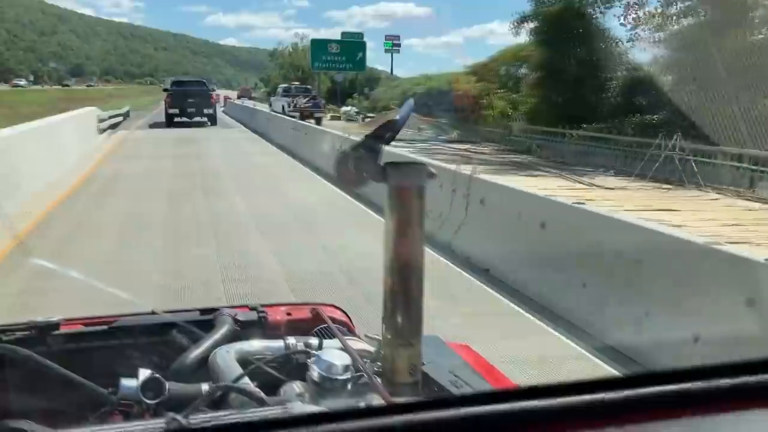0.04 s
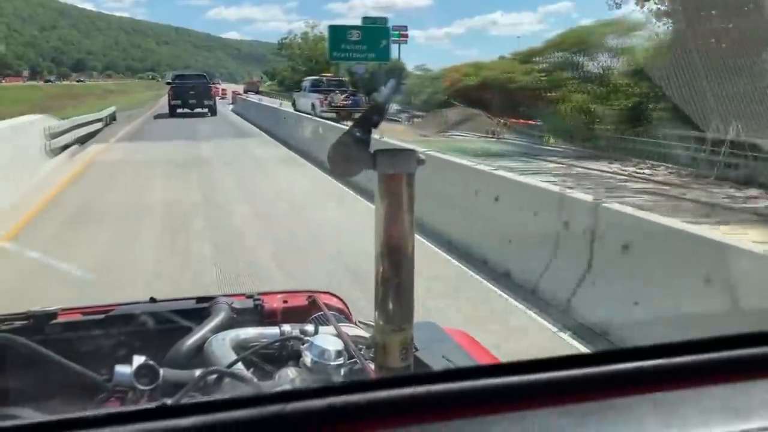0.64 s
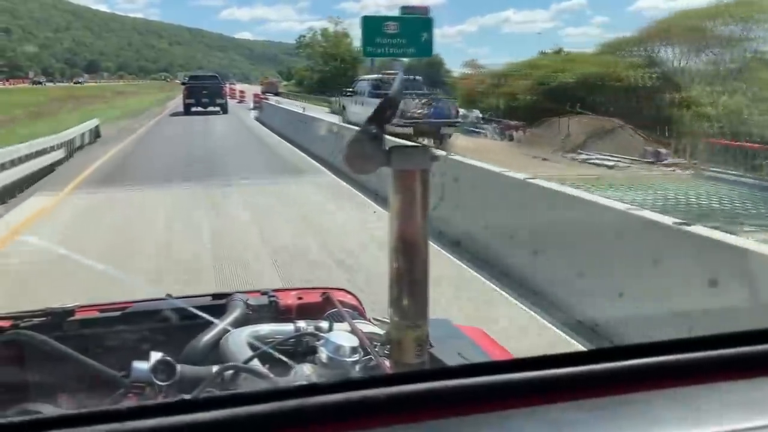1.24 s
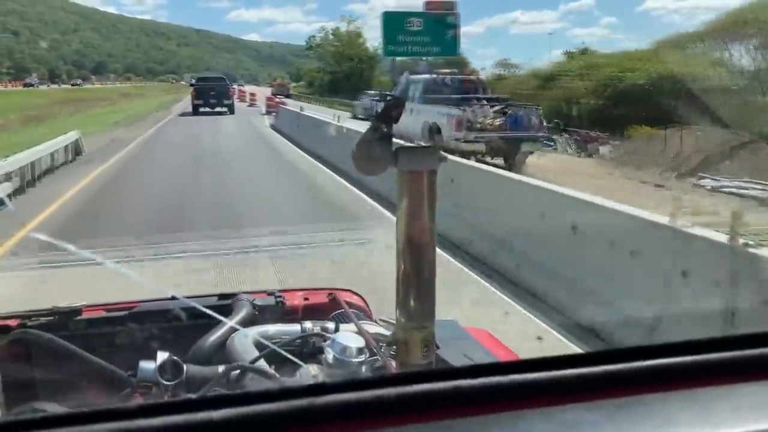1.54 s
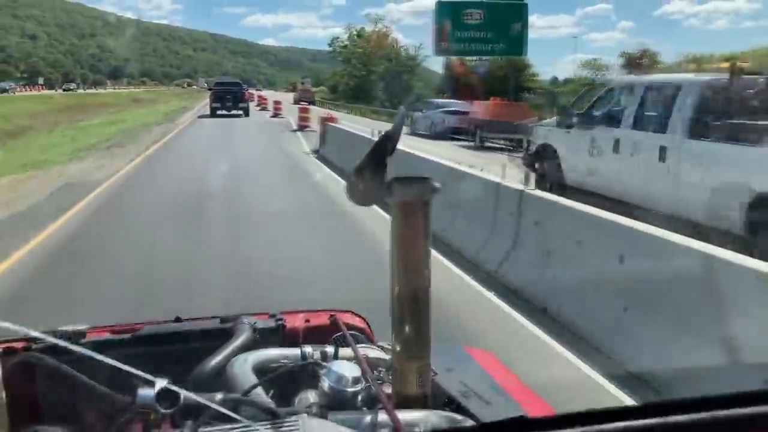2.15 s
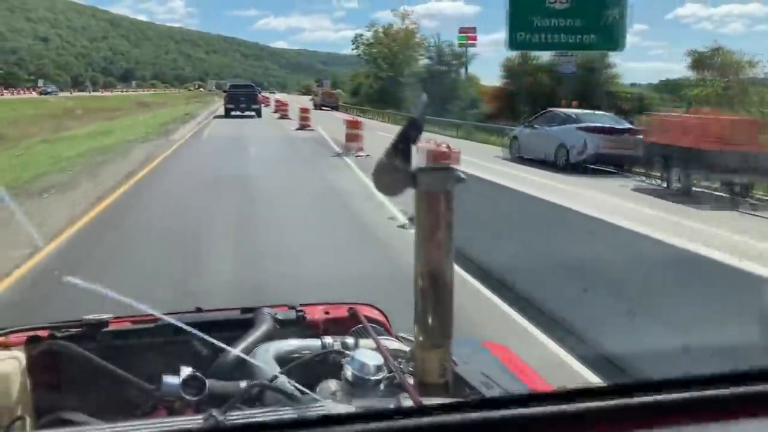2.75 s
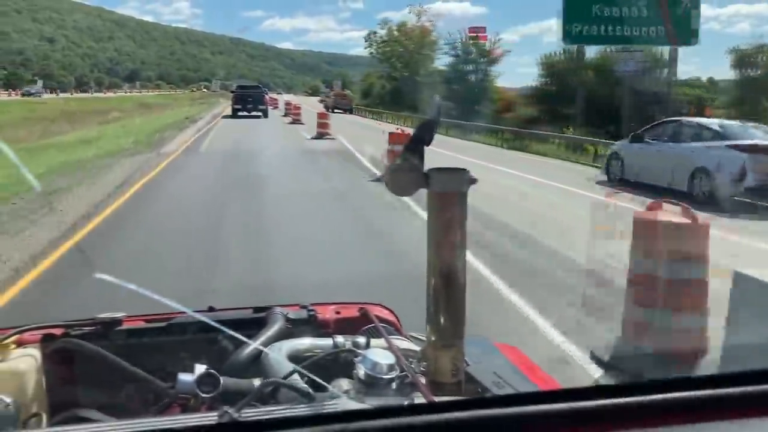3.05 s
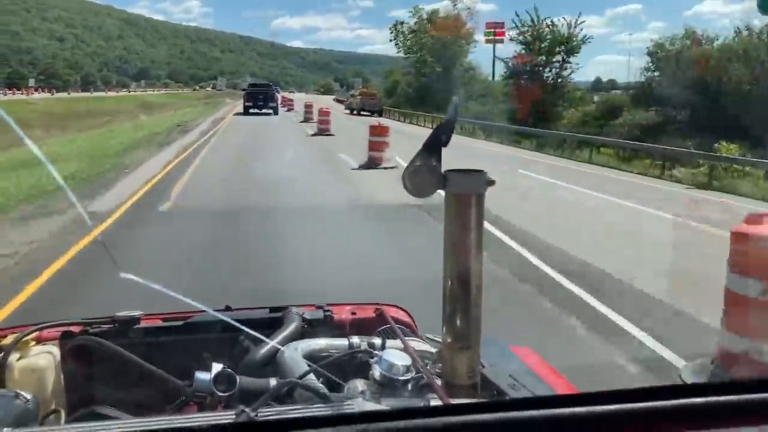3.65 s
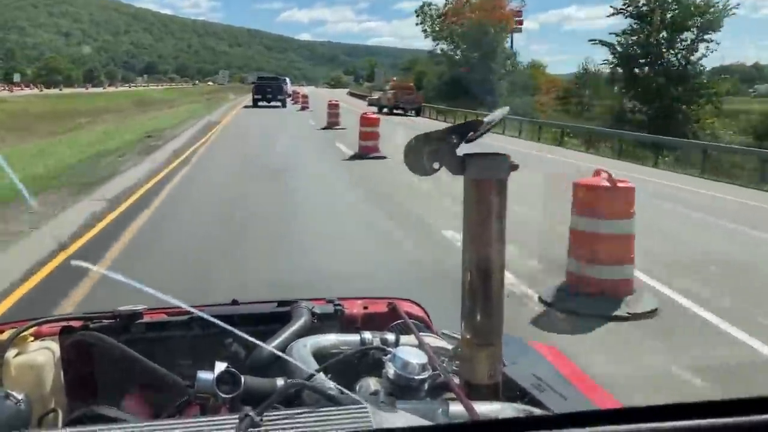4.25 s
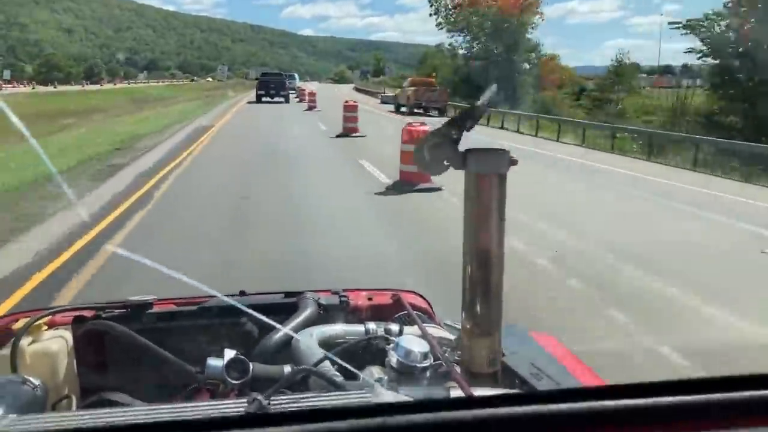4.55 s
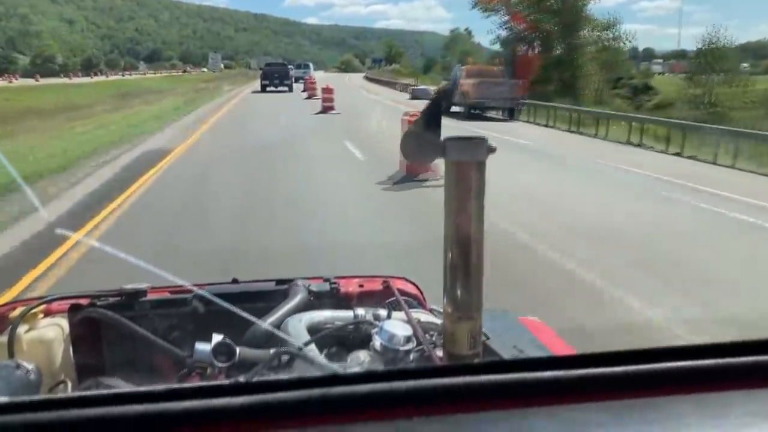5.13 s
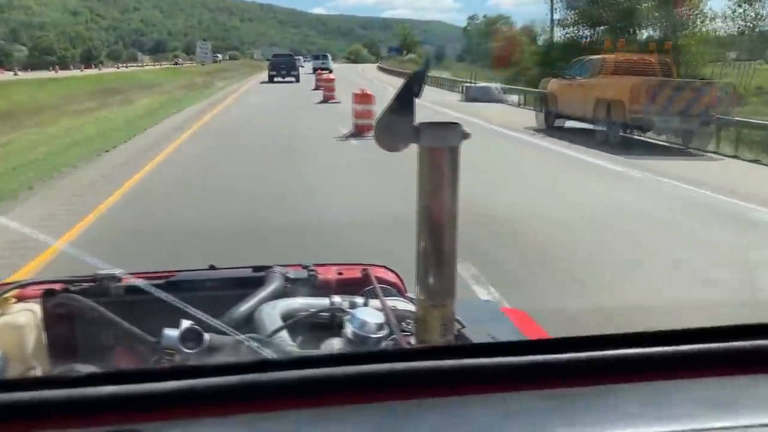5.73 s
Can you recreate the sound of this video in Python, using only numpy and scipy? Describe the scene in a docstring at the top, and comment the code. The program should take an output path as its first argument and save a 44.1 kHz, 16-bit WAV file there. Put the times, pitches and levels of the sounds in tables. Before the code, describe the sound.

Heard from inside a moving truck's cab, a turbocharged six-cylinder engine drones loudly over road rumble while its open exhaust stack barks and rasps. The turbo whistle climbs steadily. Near four seconds the throttle shuts for an upshift: air hisses out, the whistle dies and the metal rain flap clatters on the stack. The engine then pulls again at a lower pitch and the whistle rises once more.

```python
"""Turbocharged straight-six, heard from the cab

The engine pulls hard over road rumble. Its firings boom in the cab and drive an open stack through the
bonnet, which barks and rasps; they also modulate the climbing whistle of the turbo. Near four seconds
the throttle shuts for an upshift: trapped boost vents, the rain flap clatters on the stack, and then
the turbo spools up again."""
import sys
import numpy as np
from scipy import signal
from scipy.fft import rfft, irfft, next_fast_len
from scipy.io import wavfile

SR = 44100
rng = np.random.default_rng(int(sys.argv[2]) if len(sys.argv) > 2 else 0)


def transcribe(signal):
    """Save signal, clipped to [-1, 1], as a 16-bit WAV file at the path in sys.argv[1]."""
    frames = np.atleast_2d(signal).T
    limited = np.clip(frames, -1, 1)
    pcm = np.round(limited * 32767).astype(np.int16)
    wavfile.write(sys.argv[1], SR, pcm)


N = 259660
SHUT_S, OPEN_S = 3.77, 4.53  # the throttle starts to shut and to reopen
STACK_HZ = 572.5  # main note of the open stack
# Strength of the cylinders in firing order. Each entry: relative level in dB.
CYLINDER_LEVELS = [3, 0, 1, 2.5, -.5, 1]


def from_db(db):
    """Amplitude grows tenfold for every 20 dB."""
    return 10 ** (np.asarray(db) / 20)


def rms_one(x):
    """Division by the root mean square gives unit power."""
    return x / np.sqrt(np.mean(x ** 2) + 1e-20)


def ramp(start_s, length_s):
    """A linear rise from 0 to 1."""
    return np.clip((np.arange(N) / SR - start_s) / length_s, 0, 1)


def in_time(rows):
    """Linear interpolation gives each column of a timed curve at every sample."""
    times, *columns = np.transpose(rows)
    return [np.interp(np.arange(N) / SR, times, column) for column in columns]


def at_hz(points, hz):
    """Interpolation on a logarithmic frequency axis."""
    frequencies, values = np.transpose(points)
    return np.interp(np.log(hz), np.log(frequencies), values)


def drift(corner_hz):
    """Low-passed noise wanders slowly with a spread of 1."""
    step, settle = 40, 2000
    r = np.exp(-2 * np.pi * corner_hz * step / SR)
    slow = signal.lfilter([1], [1, -2 * r, r * r], rng.standard_normal(N // step + settle + 2))[settle:]
    return np.interp(np.arange(N) / step, np.arange(len(slow)), rms_one(slow))


def resonance(x, hz, width_hz):
    """Forced response of a two-pole resonator with unit gain at its peak."""
    r = np.exp(-np.pi * width_hz / SR)
    feedback = [1, -2 * r * np.cos(2 * np.pi * hz / SR), r * r]
    return signal.lfilter(np.array([1, 0, -1]) * (1 - r * r) / 2, feedback, x)


def coloured(x, peaks):
    """Parallel resonators raise or lower a sound around their own frequencies."""
    return x + sum((from_db(db) - 1) * resonance(x, hz, width) for hz, width, db in peaks)


def ring(clicks, hz, t60):
    """Free vibration: each impulse starts a damped sine of its own height."""
    r, w = from_db(-60 / (t60 * SR)), 2 * np.pi * hz / SR
    return signal.lfilter([0, np.sin(w)], [1, -2 * r * np.cos(w), r * r], clicks + 1e-18)


def pan(x, left_db):
    """A level difference between the ears places a sound to one side."""
    return x * from_db(np.array([[left_db], [-left_db]]) / 2)


def turbulence(spectrum, drive=None):
    """Noise, or a given drive, shaped in third octaves; reflections lower the left-right coherence."""
    # Each row: frequency in Hz, correlation between the ears.
    coherence = [(60, .94), (290, .85), (450, .4), (640, .25), (1300, .25), (3000, .3), (5000, .55),
                 (7000, .7), (9300, .85), (15000, .75)]
    edges = 20 * 2 ** (np.arange(30) / 3)
    if drive is None:
        drive = rng.standard_normal((2, 2, N))  # two mid-side pairs, for alternate bands
    out = 0
    for k, (low, high) in enumerate(zip(edges, edges[1:])):
        if high > spectrum[0][0] and low < spectrum[-1][0]:
            hz = np.sqrt(low * high)
            band = signal.butter(2, [low, high], "band", fs=SR, output="sos")
            mid, side = signal.sosfilt(band, drive[k % 2])
            alike = at_hz(coherence, hz)
            stereo = np.sqrt(1 + alike) * mid + np.sqrt(1 - alike) * side * [[1], [-1]]
            out = out + from_db(at_hz(spectrum, hz)) * stereo
    return rms_one(out)


def road_rumble():
    """Rolling on the road gives broadband noise, strongest at low frequencies."""
    # Each row: frequency in Hz, relative spectral density in dB.
    spectrum = [(20, -32), (32, -16), (45, -6.5), (62, 5), (85, -3.5), (130, -3.5), (200, -1.5),
                (290, -5.5), (420, -21.5), (700, -21.5)]
    # Each row: time in seconds, level in dB.
    levels = [(0.1, -12.5), (.55, -17.5), (1.75, -22), (2.25, -20), (2.9, -21), (3.4, -24), (3.7, -23),
              (3.98, -18.5), (4.43, -19), (4.8, -20.5), (5.4, -18.5), (5.89, -20)]
    return from_db(in_time(levels)[0]) * turbulence(spectrum)


def cycle_harmonics(firings, orders, waver):
    """A pattern that repeats each engine cycle has lines at multiples of that rate; each one wavers."""
    out = 0
    for per_cycle, db in orders:
        phase = 2 * np.pi * (round(per_cycle) * firings / len(CYLINDER_LEVELS) + rng.random())
        wander = drift(4.9) * np.cos(phase) + drift(9.1) * np.sin(phase)
        out = out + from_db(db) * (np.sin(phase) + waver * wander)
    return out * np.sqrt(2 / (1 + 2 * waver ** 2))


def uneven_beat(firings, boost, shut, shifted):
    """No two cylinders fire alike, so engine orders appear between the firing harmonics."""
    # Full pull. Each row: times per engine cycle, level in dB at low boost and at high boost.
    pull_orders = [(5, -32, -44), (8, -34, -42), (9, -31, -35), (10, -24, -34), (11, -31, -42),
                   (13, -34, -32), (14, -27, -30.5), (15, -22.5, -28), (16, -26, -40), (17, -31, -32),
                   (18, -26, -28), (19, -32, -45), (20, -36, -43), (21, -35, -38), (23, -38, -50),
                   (24, -30, -41), (25, -36, -45), (29, -48, -38), (31, -45, -41), (33, -34, -50)]
    # Lugging in the higher gear. Each row: times per engine cycle, level in dB.
    lug_orders = [(5, -30), (8, -35), (10, -32), (13, -30), (14, -26.5), (15, -25.5), (16, -31.5),
                  (17, -36), (18, -31), (20, -37), (21, -34), (22, -39), (23, -41)]
    boosted = [(order, low + boost * (high - low)) for order, low, high in pull_orders]
    pulling = cycle_harmonics(firings, boosted, waver=.2)
    lugging = cycle_harmonics(firings, lug_orders, waver=.5)
    return from_db(-6 * shut) * (np.sqrt(1 - shifted) * pulling + np.sqrt(shifted) * lugging)


def drone(rate, firings, boost, shut, shifted):
    """The cab resonates to the firing tone and its octave; the boom steadies under full pull."""
    # Response of the cab. Each row: frequency in Hz, level in dB.
    boom = [(82, -22), (93, -20), (100, -14), (106, -11.5), (113, -11), (119, -11.5), (168, -21.5),
            (186, -27), (194, -13), (203, -15), (212, -17.5), (238, -20.5)]
    overrun = ramp(3.92, .036) - ramp(OPEN_S, .036)  # the firing dies during the shift
    throttle_db = -3.5 * shut - 10 * overrun
    waver_db = 1.6 * (1 - boost * (1 - shifted))
    firing_db, octave_db = (at_hz(boom, k * rate) + throttle_db + waver_db * drift(7.1) for k in (1, 2))
    fundamental = pan(from_db(firing_db) * np.sin(2 * np.pi * firings), left_db=-2.5)
    octave = pan(from_db(octave_db) * np.sin(4 * np.pi * firings - .8), left_db=-2)
    return np.sqrt(2) * (fundamental + octave)


def driveshaft(rate, boost):
    """Rotation shakes the shaft once a turn; its fourth harmonic booms at lower road speed."""
    shaft_hz = .472 * np.maximum.accumulate(rate)  # keeps its speed through the shift
    phase = 2 * np.pi * np.cumsum(shaft_hz + .8 * drift(5)) / SR
    shudder = from_db(-27 + 2.5 * drift(6)) * np.sin(phase)
    return np.sqrt(2) * (shudder + from_db(-33) * (1 - boost) * np.sin(4 * phase))


def puffs(firings, depth, decay, uneven_db):
    """Amplitude modulation: each firing gives a puff of its own strength; decay is in firing periods."""
    strength = from_db(uneven_db * rng.standard_normal(1000))[firings.astype(int)]
    age = firings % 1
    puff = rms_one(strength * age * np.exp(-age / decay))
    return rms_one(1 - depth + depth * puff)


def blasts(firings, pitched, ring_s, depth, uneven_db):
    """Repetition gives pitch: each cylinder sends the same shock every cycle, plus fresh turbulence."""
    count, age = len(CYLINDER_LEVELS), np.arange(SR // 25) / SR
    shared = .15  # share of the shock's power that all cylinders have in common
    common, own = rng.standard_normal((2, 2, len(age))), rng.standard_normal((count, 2, 2, len(age)))
    shapes = (np.sqrt(shared) * common + np.sqrt(1 - shared) * own) * np.exp(-age / ring_s)
    shocks = np.zeros((2, 2, N + len(age)))
    for k, at in enumerate(np.flatnonzero(np.diff(np.floor(firings)))):
        strength = from_db(CYLINDER_LEVELS[k % count] + uneven_db * rng.standard_normal())
        shocks[..., at:at + len(age)] += strength * shapes[k % count]
    gas = rng.standard_normal((2, 2, N)) * puffs(firings, depth, decay=.39, uneven_db=2)
    return np.sqrt(pitched) * rms_one(shocks[..., :N]) + np.sqrt(1 - pitched) * gas


def pipe_flow(spectrum, drive=None):
    """Narrow resonances of stack and cab stand out of the flow noise."""
    # Each row: frequency in Hz, width in Hz, gain in dB.
    resonances = [(770, 29, 4), (895, 40, 1), (1060, 120, -5), (1226, 49, 9), (1327, 60, 0.5),
                  (1480, 31, 5.5), (1718, 23, 8.5), (1878, 67, 8.5), (2105, 27, 6), (2237, 47, 11),
                  (2467, 59, 6.5), (2740, 45, 6), (3360, 23, 2), (5790, 140, 7), (7950, 200, 5)]
    return rms_one(coloured(turbulence(spectrum, drive), resonances))


def stack_ring(rate, firings, shut):
    """Forced resonance: the firings keep the open stack ringing on one note."""
    # Each row: firings per second, level of the note in dB.
    response = [(84, -29.5), (92, -38.5), (97, -26), (104, -39.5), (107, -28.5), (112, -38), (118, -31)]
    mid, side = blasts(firings, pitched=.4, ring_s=.01, depth=.1, uneven_db=1)[0]
    drive = mid + .5 * side * [[1], [-1]]
    note = resonance(resonance(drive, STACK_HZ, width_hz=46), STACK_HZ, width_hz=92)
    return from_db(at_hz(response, rate) - 11 * shut) * rms_one(note)


def exhaust(rate, firings, turbo_hz, boost, shut, shifted):
    """Pulsating flow makes the stack bark, rasp and hiss; at full boost it tightens to a snarl."""
    # Four spectra of the gas flow. Each row: frequency in Hz, relative spectral density in dB.
    bark_spectrum, rasp_spectrum = [(230, -9), (330, 1), (400, 3), (490, -4), (575, -1), (670, -2),
                                    (800, -3.5), (950, -3), (1100, -12), (1600, -45)], [(750, -13), (1050, -4), (1250, 1), (1500, 1), (1800, -2),
                                                  (2250, -6), (2800, -5.5), (3300, -4), (4100, -9.5),
                                                  (5200, -10.5), (7000, -31)]
    snarl_spectrum, jet_spectrum = [(900, -5), (1220, 14), (1450, 6.5), (1700, 7.5), (2200, 5), (2800, -29)], [(2200, -6), (3200, 0), (4200, 2), (5200, -3), (6500, 0),
                                                   (8500, 1.5), (10000, 0), (11400, .5), (13000, -6),
                                                   (15500, -13)]
    # Flow noise against turbo speed. Each row: whistle pitch in Hz, rasp level in dB, jet level in dB.
    flow_levels = [(3255, -32, -40.5), (3445, -32.5, -31.5), (4700, -31.5, -34), (5340, -33, -32),
                   (5500, -31, -27), (6980, -33.5, -29.5)]
    # The bark swells as the turbo first spools up. Each row: time in seconds, gain in dB.
    swell = [(.3, 0), (.7, 4), (1.2, 0)]
    full_pull = boost ** 2 * (1 - shifted)
    flow_hz, rasp_levels, jet_levels = np.transpose(flow_levels)
    rasp_db = np.interp(turbo_hz, flow_hz, rasp_levels) - 5 * shut
    jet_db = np.interp(turbo_hz, flow_hz, jet_levels) - 11.5 * shut
    pull_db, lug_db = -25.5 - .08 * (rate - 105), -27  # the engine runs smoother as it speeds up
    bark_db = (1 - shifted) * pull_db + shifted * lug_db + in_time(swell)[0] - 3 * shut
    low_blasts = blasts(firings, pitched=.3 + .25 * full_pull, ring_s=.004, depth=.6, uneven_db=1.5)
    high_blasts = blasts(firings, pitched=.35 + .3 * full_pull, ring_s=.005, depth=.48, uneven_db=2.3)
    hard_blasts = blasts(firings, pitched=.7, ring_s=.004, depth=.3, uneven_db=1.2)
    bark = from_db(bark_db) * pipe_flow(bark_spectrum, low_blasts) + stack_ring(rate, firings, shut)
    rasp = from_db(rasp_db) * (1 - .33 * full_pull) * pipe_flow(rasp_spectrum, high_blasts)
    snarl = from_db(rasp_db + 3.5) * full_pull * pipe_flow(snarl_spectrum, hard_blasts)
    jet = from_db(jet_db) * pipe_flow(jet_spectrum) * puffs(firings, depth=.33, decay=.2, uneven_db=2.3)
    return pan(bark, left_db=-2) + rasp + snarl + jet


def turbo_whistle(firings, hz, shifted):
    """Exhaust pulses modulate the turbo's tone into sidebands, which duct resonances pick out in turn."""
    # The whistle dies on the shut throttle and returns. Each row: time in seconds, level in dB.
    levels = [(.1, -38), (.45, -38), (.62, -36), (.8, -37), (1.05, -37), (1.25, -41), (1.6, -39),
              (1.9, -40), (2.3, -40), (2.55, -34), (2.83, -33), (3.1, -37), (3.5, -32), (3.77, -30.5),
              (3.93, -66), (4.53, -66), (4.6, -46), (4.7, -42), (4.8, -36.5), (4.92, -41), (5.05, -55),
              (5.25, -46), (5.4, -37), (5.6, -44), (5.75, -39.5), (5.89, -44)]
    # Duct resonances. Each row: frequency in Hz, width in Hz, gain in dB.
    ducts = [(3790, 130, 4), (4260, 100, 3), (4500, 70, 3), (4760, 60, 5), (4860, 60, 5), (5220, 110, 4),
             (5750, 90, 8), (6100, 80, 4), (6920, 100, 8), (7100, 60, 5), (7330, 90, 6)]
    pull_swing, lug_swing = .032, .016  # fractional pitch swing at 5 kHz
    depth = (pull_swing + shifted * (lug_swing - pull_swing)) * (hz / 5000) ** .3
    swing = depth * np.sin(2 * np.pi * firings) * (1 + .25 * drift(20))
    phase = 2 * np.pi * np.cumsum(hz * (1 + swing) + 11 * drift(25)) / SR
    halo = np.array([drift(300) * np.sin(phase) + drift(210) * np.cos(phase) for side in range(2)])
    second = from_db(-12) * resonance(np.sin(2 * phase), hz=8450, width_hz=7200)
    third = from_db(-14) * resonance(np.sin(3 * phase), hz=11000, width_hz=7200)
    tone = np.sqrt(2) * (np.sin(phase) + second + third)
    gain = from_db(in_time(levels)[0] + 1.2 * drift(7)) * puffs(firings, depth=.55, decay=.3, uneven_db=3)
    return coloured(gain * (tone + from_db(-9) * halo), ducts)


def cab_reflections(x):
    """Comb filtering: echoes off glass and dash interfere differently at each ear."""
    # Each row: left delay in seconds, right delay in seconds, gain.
    echoes = [(.0019, 0.0028, 0.22), (.0037, 0.0043, -0.27), (.0058, 0.0061, 0.39), (.0097, .0089, -0.32),
              (0.0145, 0.015, 0.074)]
    out = x.copy()
    for *delays, gain in echoes:
        for side, delay in enumerate(delays):
            out[side] += gain * np.pad(x[side], (round(delay * SR), 0))[:N]
    return out


def pop(at_s):
    """Impulse response: one hard firing sets the stack's main note ringing."""
    click = np.zeros(N)
    click[round(at_s * SR)] = from_db(-9.5)
    return ring(click, STACK_HZ, t60=.049)


def high_whine(firings):
    """A thin tone comes in as the turbo spools up, amplitude-modulated by the firings."""
    # Each row: time in seconds, frequency in Hz, level in dB.
    course = [(.4, 11250, -70), (.58, 11250, -45), (1.1, 11280, -47.5), (2.4, 11450, -52),
              (2.7, 11450, -80), (4.56, 11500, -80), (4.62, 11330, -47), (4.7, 11080, -42.5),
              (4.78, 10950, -47), (4.86, 10900, -75)]
    hz, db = in_time(course)
    phase = 2 * np.pi * np.cumsum(hz + 18 * drift(30)) / SR
    tone = np.sqrt(2) * from_db(db + 2 * drift(10)) * np.sin(phase)
    return tone * puffs(firings, depth=.4, decay=.3, uneven_db=3)


def cab_mode(shut, hz, width_hz):
    """Rough running on the shut throttle excites a low standing wave in the air of the cab."""
    hum = resonance(resonance(rng.standard_normal(N), hz, width_hz), hz, 2 * width_hz)
    return shut * from_db(-22) * rms_one(hum)


def boost_vent():
    """Jet noise: trapped boost escapes in gusts of hiss and thin whine that swell, hold and decay."""
    # Each row: start in seconds, end in seconds, hiss level in dB, whine level in dB.
    gusts = [(3.866, 4.073, -34.5, -43), (4.103, 4.329, -39, -41), (4.52, 4.56, -35, -41)]
    # Each row: frequency in Hz, relative spectral density in dB.
    hiss_spectrum = [(1500, -9), (2300, 5), (3300, 6), (4500, 6), (5500, -1), (7000, 2), (10000, -2),
                     (12500, -11)]
    hiss_fall_db_per_s, whine_fall_db_per_s, whine_hz = 205, 56, 2090
    hiss_gain = whine_gain = 0
    for start_s, end_s, hiss_db, whine_db in gusts:
        attack = ramp(start_s, length_s=.014)
        after_s = np.maximum(np.arange(N) / SR - end_s, 0)
        hiss_gain += attack * from_db(hiss_db - hiss_fall_db_per_s * after_s)
        whine_gain += attack * from_db(whine_db - whine_fall_db_per_s * after_s)
    narrow_noise = resonance(rng.standard_normal((2, N)), whine_hz, width_hz=70)
    whine = rms_one(resonance(narrow_noise, whine_hz, width_hz=140))
    flutter = from_db(1.5 * drift(25))
    return hiss_gain * flutter * turbulence(hiss_spectrum) + whine_gain * whine


def rain_flap(crack_db, ring_db):
    """Impact excites modes: the flap drops on the rim with a gritty crack and a short metal ring."""
    # Each row: start in seconds, relative level in dB, crack decay in seconds, ring offset in dB.
    hits = [(4.169, -25, .0047, -2), (4.206, -25, .005, 1), (4.271, -28, .0056, -4), (4.302, -33, .006, -5),
            (4.316, -28, .008, -9), (4.328, -25, .012, -12), (4.486, -36, .005, -8), (4.512, -33, .008, -8),
            (4.536, -27, .0075, -2), (4.574, -31, .0072, -14)]
    # Modes of flap and stack. Each row: frequency in Hz, level in dB, seconds to fall by 60 dB.
    modes = [(2180, -16, .06), (2290, -22, .06), (3900, -20, .04), (4530, -22, .08), (7020, -9, .035),
             (7250, -11, .03), (7700, -12, .03)]
    # Each row: frequency in Hz, relative spectral density in dB.
    crack_spectrum = [(700, -1), (1300, 17.5), (2400, 11), (4300, 7), (7000, 7), (11400, 5.5), (15000, -16)]
    clicks, envelope = np.zeros(N), np.zeros(N)
    for start_s, db, decay_s, offset_db in hits:
        at = round(start_s * SR)
        clicks[at] = from_db(db + offset_db)
        envelope[at:] += from_db(db) * np.exp(-np.arange(N - at) / (decay_s * SR))
    rings = sum(from_db(db) * ring(clicks, hz, t60) for hz, db, t60 in modes)
    return from_db(crack_db) * envelope * turbulence(crack_spectrum) + from_db(ring_db) * rings


def from_right(x):
    """Interaural delay: the stack stands to the right, so the sound reaches the left ear late."""
    # Each row: frequency in Hz, phase lag in radians.
    left_lag = [(30, .1), (110, .24), (300, .25), (600, 0), (2200, 0), (3200, 4), (3800, 6), (4400, 6.9),
                (5300, 9.6), (6200, 11.8), (7000, 12.8), (9300, 15.7), (11400, 18.9), (13600, 22.4),
                (15500, 25)]
    size = next_fast_len(N + SR // 10)
    lag = np.interp(np.fft.rfftfreq(size, 1 / SR), *np.transpose(left_lag))
    left = irfft(rfft(x[0], size) * np.exp(-1j * lag), size)[:N]
    return np.array([left, x[1]])


def scene():
    """The sources superpose; the crank times every pulsing layer, and the throttle shuts once."""
    # Each row: time in seconds, firings per second.
    crank_speed = [(0, 93.6), (.4, 96.2), (1, 99.6), (2.3, 107), (3, 112.4), (3.55, 117.2), (3.77, 118.2),
                   (3.9, 114.2), (4.22, 107), (4.38, 96), (4.52, 82), (5.2, 83.2), (5.89, 86.5)]
    # Each row: time in seconds, whistle pitch in Hz.
    turbo_speed = [(0, 3230), (.42, 3370), (.6, 3590), (1, 4220), (1.4, 4620), (1.8, 4900), (2.2, 4990),
                   (2.5, 5080), (2.65, 5290), (2.83, 5750), (3, 6150), (3.3, 6720), (3.79, 7150),
                   (3.88, 6950), (4.56, 3650), (4.68, 3650), (4.82, 3830), (5.33, 4800), (5.5, 4930),
                   (5.64, 5130), (5.89, 5270)]
    (rate,), (turbo_hz,) = in_time(crank_speed), in_time(turbo_speed)
    firings = np.cumsum(rate) / SR  # running count
    boost, shifted = ramp(1.3, 1.5), ramp(3.75, .45)  # shifted is 1 in the higher gear
    shut = ramp(SHUT_S, .08) - ramp(OPEN_S, .35)
    turbo = cab_reflections(turbo_whistle(firings, turbo_hz, shifted))
    engine = uneven_beat(firings, boost, shut, shifted) + drone(rate, firings, boost, shut, shifted)
    rolling = driveshaft(rate, boost) * (1 - .56 * shut) + road_rumble()
    stack = exhaust(rate, firings, turbo_hz, boost, shut, shifted) + pop(at_s=.099)
    whine = high_whine(firings)
    upshift = boost_vent() + rain_flap(crack_db=2, ring_db=3) + cab_mode(shut, hz=183, width_hz=46)
    return from_right(rolling + engine + stack + turbo + whine + upshift)


def record(dry):
    """A low-passed murmur, then the full sound cuts in with a click; soft peaks, a band-limited top."""
    start_s, cutoff_hz = .0635, 15600
    since = np.arange(N) / SR - start_s
    murmur = from_db(-16.5) * signal.sosfilt(signal.butter(1, 900, fs=SR, output="sos"), dry)
    click = from_db(-7) * np.exp(-np.abs(since) / .00088)
    x = np.where(since < 0, murmur, dry * ramp(start_s, .00055) + click)
    rounded = x / (1 + (x / .95) ** 8) ** (1 / 8)
    return signal.sosfilt(signal.ellip(10, .1, 90, cutoff_hz, fs=SR, output="sos"), rounded)


dry = scene()
out = record(dry)
transcribe(out)
```